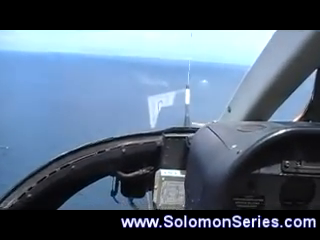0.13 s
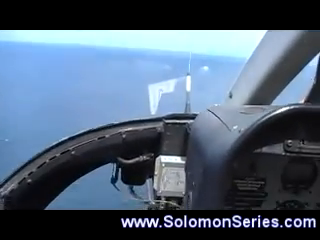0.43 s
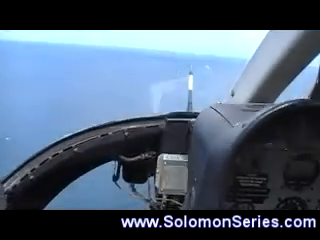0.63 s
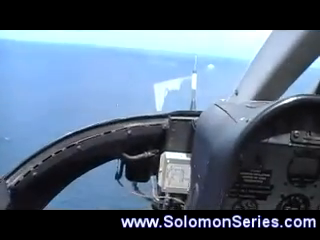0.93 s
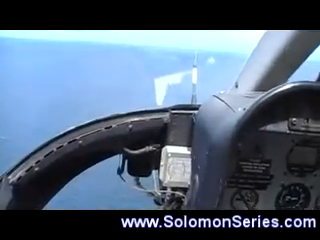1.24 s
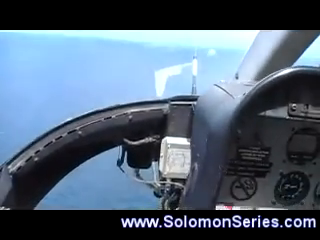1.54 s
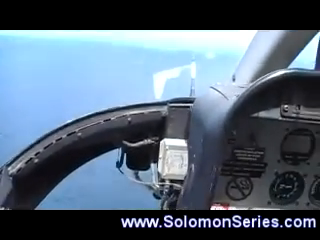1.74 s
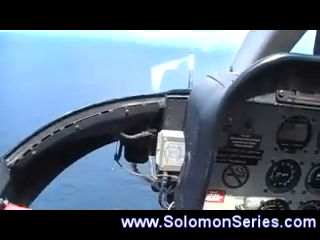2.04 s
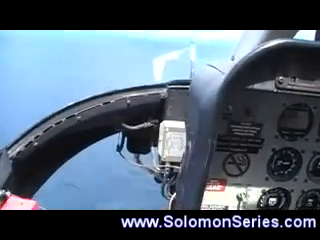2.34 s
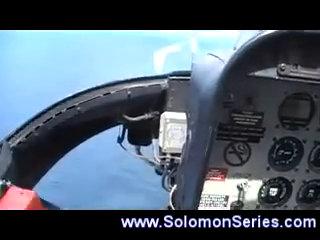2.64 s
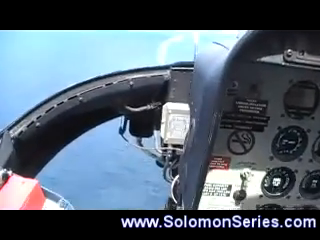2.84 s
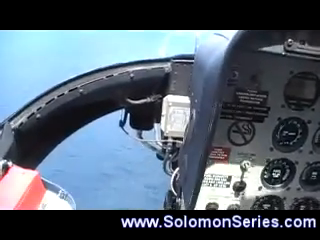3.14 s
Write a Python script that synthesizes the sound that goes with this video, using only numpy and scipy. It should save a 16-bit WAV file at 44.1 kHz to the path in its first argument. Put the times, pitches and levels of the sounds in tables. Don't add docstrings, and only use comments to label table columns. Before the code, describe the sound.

A turbine helicopter drones loudly and continuously inside its cabin, fast rotor throb about 28 beats a second beneath dense air roar and pulsing hiss. A thin, steady gear whine near 2 kHz rises around 0.4 s, then weakens after 2.6 s, faintest near 3.1 s. A faint loose part buzzes with the blades. Dull thuds come at 0.4, 1.8, 2.0 and, hardest, 2.5 s. Small camera microphone, slightly limited treble.

```python
import sys
import numpy as np
from scipy import signal
from scipy.fft import rfft, irfft
from scipy.io import wavfile
from scipy.ndimage import uniform_filter1d

SR = 44100
rng = np.random.default_rng(int(sys.argv[2]) if len(sys.argv) > 2 else 0)


def boost(x):
    u = np.asarray(x, float) / 20
    return 10 ** u


def bounce(signal):
    frames = np.transpose(np.atleast_2d(signal))
    limited = np.clip(frames, -1, 1)
    pcm = np.round(limited * 32767).astype(np.int16)
    wavfile.write(sys.argv[1], SR, pcm)


N = 145089
T = np.arange(N) / SR
HZ = np.maximum(np.fft.rfftfreq(N, 1 / SR), 1)

ROTOR_HZ, ROTOR_START = 6.886, .02
# f/Hz, left over right/dB, left lead/rad, likeness/0-1 (jumps up above 6.7
# kHz)
PAIR = [(25, 2.5, -0.32, .99), (150, -3.5, -0.34, 1), (350, -3, -0.45, 0.93), (450, -4, -0.12, 0.97),
        (1100, -2.5, .05, 0.86), (2500, -2, -0.11, 0.77), (6700, -1.4, -0.047, 0.62),
        (6760, -.8, -.01, .985), (13500, -2, 0.077, 0.98)]


def column(table, hz, k):
    table = np.array(table, float)
    return np.interp(np.log(hz), np.log(table[:, 0]), table[:, k])


def walk(rate):
    hold = int(SR / rate)
    held = np.repeat(rng.standard_normal(N // hold + 1), hold)
    return 1.49 * uniform_filter1d(uniform_filter1d(held, hold), hold)[:N]


def noise_band(hz, width_hz):
    x = irfft(rfft(rng.standard_normal(N)) * np.exp(-((HZ - hz) / width_hz) ** 2), N)
    return x / x.std()


def stack(cycles, rows, skew, waver_db):
    total = 0
    for multiple, db, sign in rows:
        level = np.sqrt(2) * boost(db + waver_db * walk(2.91))
        total = total + sign * level * np.cos(2 * np.pi * multiple * cycles + skew)
    return total


def rotors(clock):
    # multiple of blade, tail or shaft rate, level/dB rms, sign (cabin modes turn some over)
    blade_rows = [(1, -30, -1), (1.5, -42, 1), (1.75, -40, -1), (2, -33, -1), (3, -36, -1), (4, -29.5, 1),
                  (5, -31, 1), (7, -41, 1), (10, -36, 1)]
    tail_rows = [(1, -30.5, -1), (2, -22, 1), (3, -32, 1), (4, -33.5, 1), (5, -36.5, -1), (6, -35.5, -1)]
    shaft_rows = [(1, -22.5, 1), (2, -30.5, 1)]
    tail_hz, shaft_hz = 83.365, 105.3
    blade_lag, tail_lag, shaft_lag = .255, .16, -.19
    suction_skew, shake_skew = 2.8, -.7
    main = stack(4 * (ROTOR_HZ * clock + ROTOR_START) - blade_lag, blade_rows, suction_skew, 1.2)
    tail = stack(tail_hz * clock - tail_lag, tail_rows, suction_skew, .8)
    shaft = stack(shaft_hz * clock - shaft_lag, shaft_rows, shake_skew, .32)
    return main + tail + shaft


def tone(hz, db, pan_db, clock):
    phase = .69 * walk(6.17) + 6 * rng.random()
    wave = np.sqrt(2) * boost(db) * np.cos(2 * np.pi * hz * clock + phase)
    return wave * boost(np.array([[pan_db], [-pan_db]]) / 2)


def gears(clock):
    # t/s, level/dB rms
    whine_levels = [
        (0, -33.5),
        (.34, -32),
        (.4, -28),
        (1.4, -30),
        (2.55, -30.5),
        (2.62, -33),
        (3.02, -34),
        (3.1, -39),
        (3.29, -37),
    ]
    # f/Hz, level/dB rms at start, middle and end, left over right/dB
    mesh_rows = [(518.7, -38, -38, -37, 2), (741.6, -41, -34, -44, 1), (1617.7, -39, -38, -36, 3.5),
                 (1828.8, -43, -47, -46, 0), (2210.6, -51, -49, -46, 5), (2952, -57, -57, -54, 0),
                 (3238, -57, -57, -57, 0), (3790.6, -56, -55, -55, -1), (4001.2, -55, -52, -54, 0),
                 (4686, -56, -56, -56, 0), (6277, -57, -58, -57, 0)]
    whine_db = np.interp(T, *np.array(whine_levels).T) + .9 * walk(10)
    out = tone(2000.6, whine_db, 1.5, clock)
    for hz, *dbs, pan_db in mesh_rows:
        swell_db = np.interp(T, np.linspace(0, T[-1], len(dbs)), dbs)
        out = out + tone(hz, swell_db + 2 * walk(8.7), pan_db, clock)
    return out


def airflow(turns):
    # f/Hz, level/dB per Hz
    roar_curve = [(8, -11), (75, -4), (125, 2.5), (380, -5), (600, -3.5), (1100, -9.5), (2400, -20.5),
                  (4600, -23.5)]
    hiss_curve = [(4900, -25.5), (7200, -24.5), (9200, -18.5), (10300, -21.5), (12200, -28), (12900, -29),
                  (13280, -15.5), (13750, -29), (14300, -32)]
    # f/Hz, width/Hz, level/dB
    panel_rows = [(50.6, 12, 7), (99, 8, -5), (140, 14, -1.5), (245, 17, -3), (383, 89, -2),
                  (283, 123, 2.5), (492, 55, 2), (1038, 98, 3), (1670, 310, 3), (2030, 490, 3),
                  (2630, 66, 3), (2900, 61, 4), (3840, 550, 1.5), (4440, 40, 6)]
    # f/Hz, depth once a turn/dB, its place/turns, depth once a blade/dB, its place/blade gaps
    throb_curve = [(200, .3, .4, 1.0, .35), (500, .6, .37, .9, .35), (1000, .2, .5, 1.7, .46),
                   (2800, .5, .1, .3, .7), (4400, .9, .13, .8, .86), (6500, .5, .2, .6, .9),
                   (8000, 2.2, .546, .1, .9), (10500, 2.4, .546, .1, .9), (12500, 1.6, .53, .2, .9),
                   (13200, .1, .5, .1, .9)]
    # t/s, level/dB
    gust_levels = [(0, 0.6), (.3, 0.4), (.55, 0.6), (.7, -.6), (.95, -0.4), (1.13, 0.6), (1.3, -0.55),
                   (1.6, -.2), (1.85, -1), (2.03, 1.5), (2.2, -.8), (2.4, -0.1), (2.55, 1.4), (2.77, -1.5),
                   (2.97, 1.3), (3.12, 0.7), (3.29, -0.3)]
    roar_db, gust_db, flicker_db, flutter_db = -18, 1.1, .5, 1.0
    calm_hz = 4960

    panels_db = sum(db * np.exp(-(2 * (HZ - hz) / width_hz) ** 2) for hz, width_hz, db in panel_rows)
    colour = boost(column([*roar_curve, *hiss_curve], HZ, 1) + panels_db)
    mid, side = rfft(rng.standard_normal((2, N))) * colour
    like = np.clip(column(PAIR, HZ, 3), 0, 1)
    pair = np.array([1, -1])[:, None] * side * np.sqrt(1 - like) + mid * np.sqrt(1 + like)

    gust = np.interp(T, *np.array(gust_levels).T)
    gust = gust - gust.mean()
    near = walk(14)
    out = 0
    for third in range(-5, 30):
        hz = 20 * 2 ** (third / 3)
        near = .87 * near + .51 * walk(14)
        once, at, blade, gap = (column(throb_curve, hz, k) for k in range(1, 5))
        turn_db = once * (1 + .08 * near) * np.cos(2 * np.pi * (turns - at))
        blade_db = blade * np.cos(2 * np.pi * (4 * turns - gap))
        gusting_db = gust_db * gust * min(3000 / hz, hz / 200, 1)
        unrest_db = gusting_db + flutter_db * near + flicker_db * walk(4.02)
        db = turn_db + blade_db + unrest_db * min(calm_hz / hz, 1)
        band = np.clip(1 - abs(3 * np.log2(HZ / hz)), 0, 1)
        out = out + boost(db) * irfft(pair * band, N)
    return out * boost(roar_db) / np.sqrt(np.mean(out ** 2))


def ticks(turns):
    blade_pattern_db = [-2, -4.1, -10, -15.5]
    tick_hz, width_hz, tick_s, tick_db, scatter_db = 7870, 150, .004, -32, 1.5
    ring = 1.2
    at = np.flatnonzero(np.diff(np.floor(4 * turns)))
    blade = np.floor(4 * turns[at + 1]).astype(int) % 4
    late, chance = rng.standard_normal((2, len(at)))
    place = np.clip(at + (.001 * SR * late).astype(int), 0, N - 1)
    kick = np.zeros(N)
    kick[place] = boost(tick_db + np.array(blade_pattern_db)[blade] + scatter_db * chance)
    shape = np.exp(-((T[:SR // 20] - T[SR // 40]) / tick_s) ** 2)
    buzz = noise_band(tick_hz, width_hz) + ring * np.sin(2 * np.pi * tick_hz * T)
    return signal.fftconvolve(kick, shape, "same") * buzz


def bumps():
    # t/s, peak level/dB
    bump_rows = [
        (0.388, -14.5),
        (1.816, -16),
        (2.04, -14),
        (2.511, -10.5),
    ]
    bump_s, bump_db, rattle_db = .011, -5.5, -20
    shape = sum(boost(db + bump_db) * np.exp(-((T - s - bump_s / 2) / bump_s) ** 2) for s, db in bump_rows)
    return shape * (noise_band(560, 660) + boost(rattle_db) * noise_band(4200, 2500))


def drop_faint_treble(x):
    # f/Hz, level/dB over the mean at 12-12.8 kHz
    need_curve = [(10900, -6.5), (12000, -4.3), (13000, -3.8), (13600, -1.5), (13900, 1), (14220, 2.5)]
    from_hz, top_hz, band_bins, wander_db = 10900, 14220, 5, 1.3
    hz, _, z = signal.stft(x, SR, "cosine", 2048)
    mean = np.sqrt(np.mean(abs(z[:, (hz > 12000) & (hz < 12800)]) ** 2))
    need = mean * boost(np.resize(wander_db * walk(9)[::1024], z.shape[2]))
    for k in range(np.searchsorted(hz, from_hz), np.searchsorted(hz, top_hz), band_bins):
        band = slice(k, k + band_bins)
        loudness = np.sqrt(np.mean(abs(z[:, band]) ** 2, axis=(0, 1)))
        z[:, band] *= loudness > need * boost(column(need_curve, hz[k], 1))
    z[:, hz > top_hz] = 0
    return signal.istft(z, SR, "cosine", 2048)[1][:, :N]


def scene():
    clock = T + np.cumsum(.0002 * walk(1.2)) / SR
    turns = ROTOR_HZ * clock + ROTOR_START
    return rotors(clock) + gears(clock) + airflow(turns) + ticks(turns) + bumps()


def top_cut(x):
    return signal.sosfilt(signal.butter(12, 14890, fs=SR, output="sos"), x)


def record(dry):
    tilt = boost(column(PAIR, HZ, 1) / 2) * np.exp(.5j * column(PAIR, HZ, 2))
    x = irfft(rfft(dry) * np.array([tilt, 1 / tilt]), N)
    rounded = 1.8 * np.tanh(x / 1.8)
    mix = drop_faint_treble(rounded)
    return top_cut(mix)


dry = scene()
out = record(dry)
bounce(out)
```